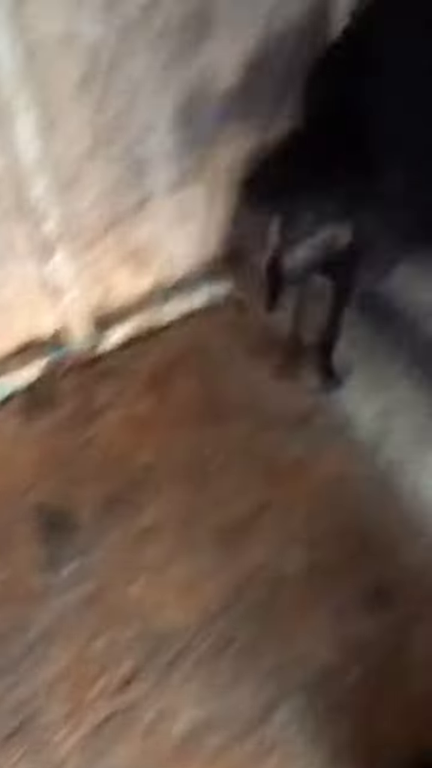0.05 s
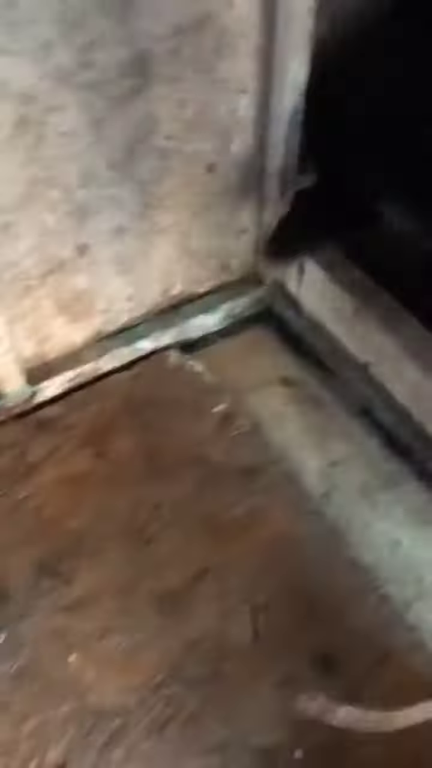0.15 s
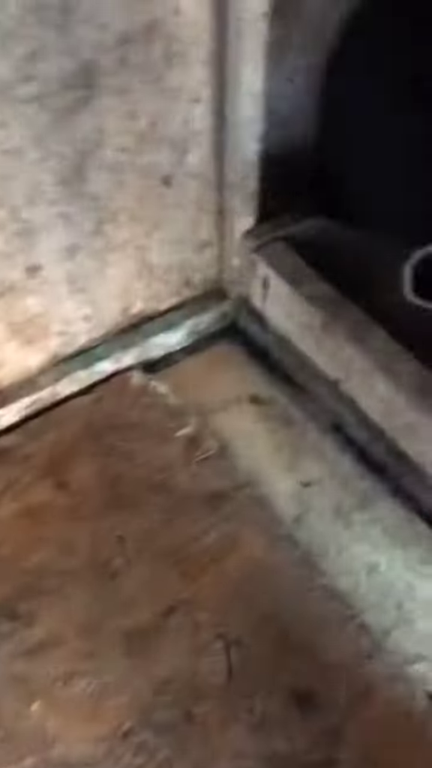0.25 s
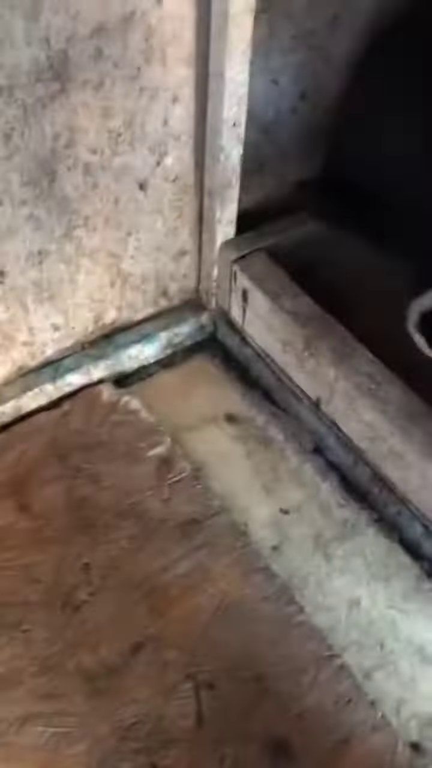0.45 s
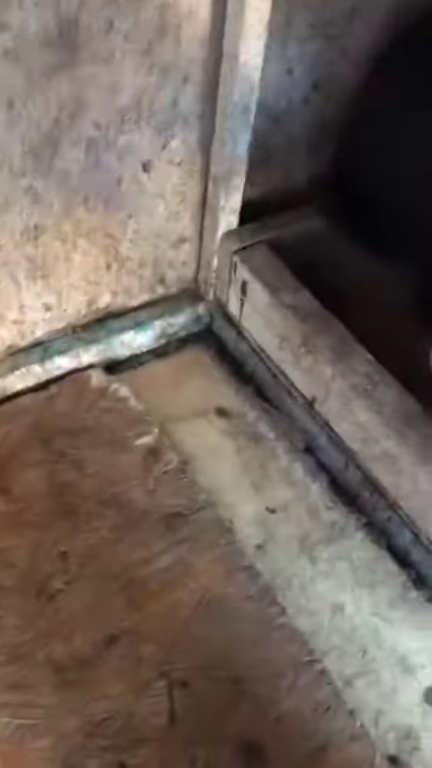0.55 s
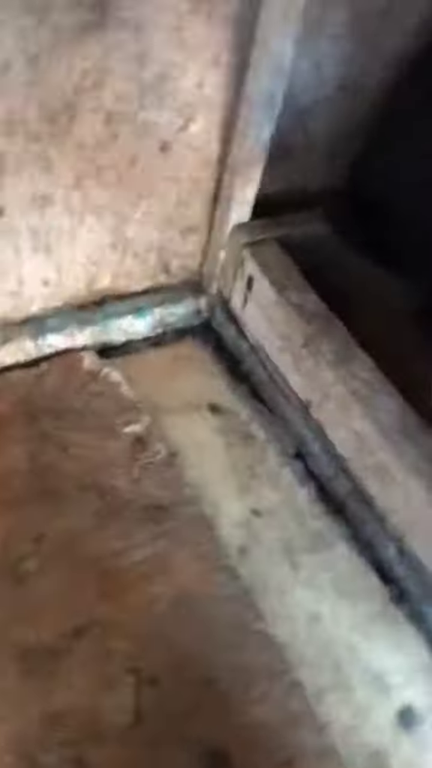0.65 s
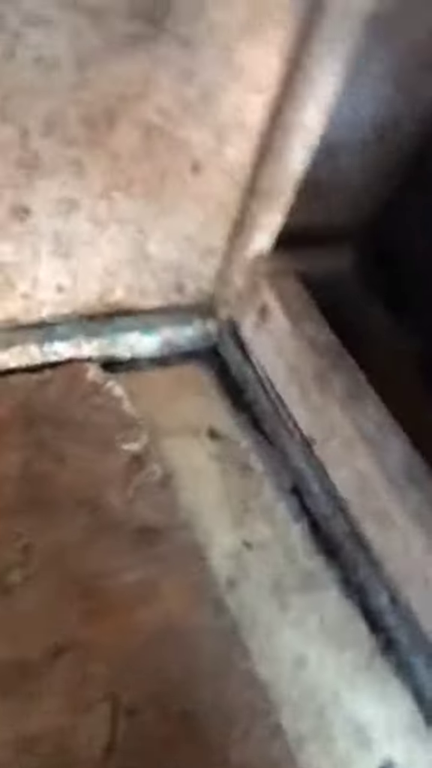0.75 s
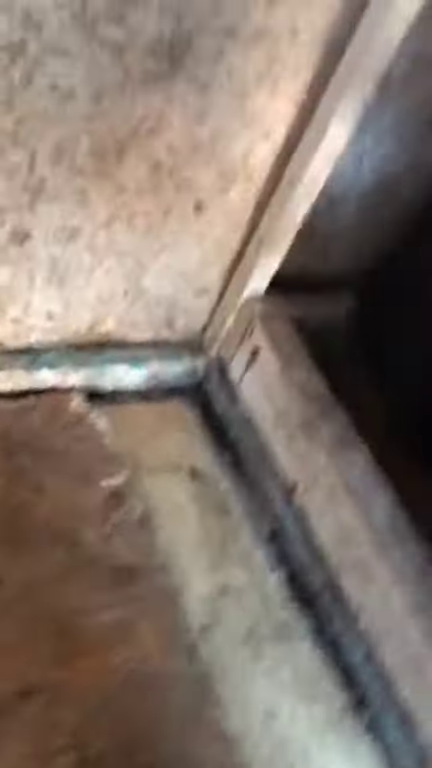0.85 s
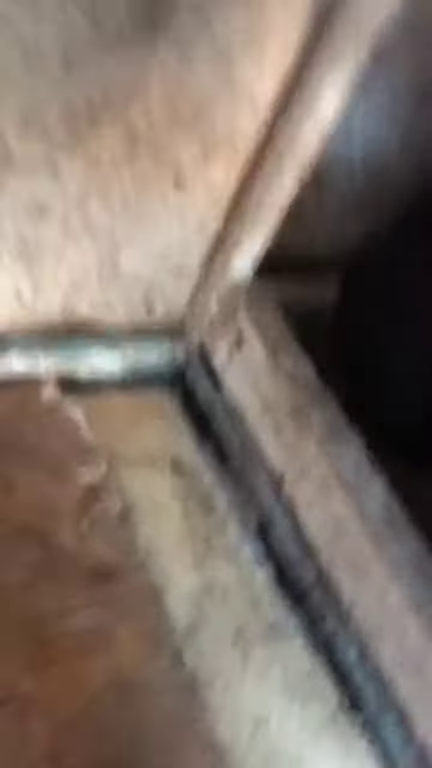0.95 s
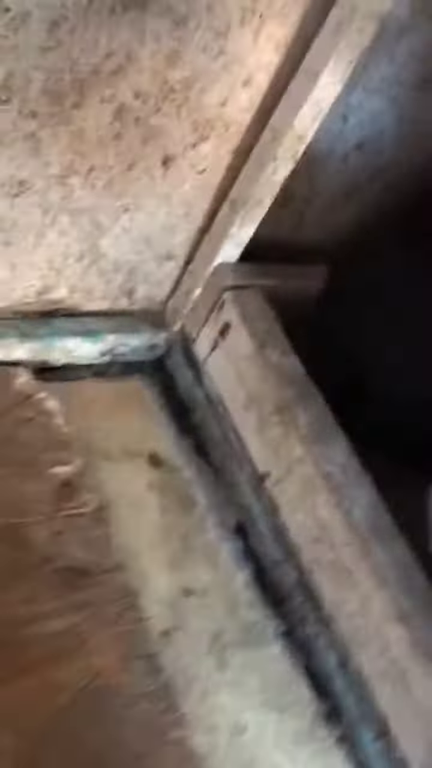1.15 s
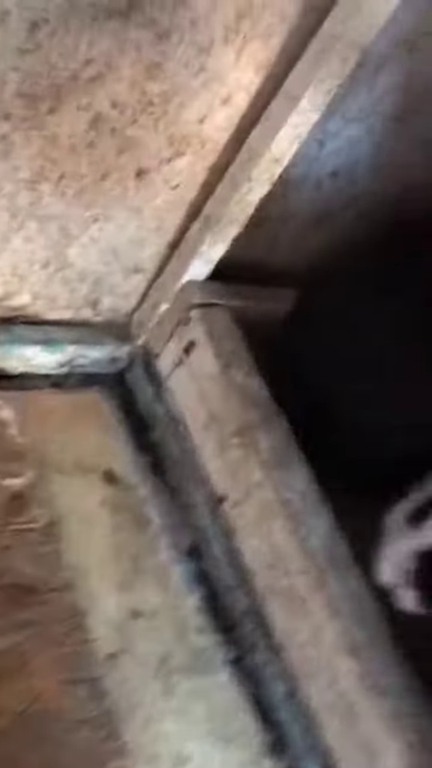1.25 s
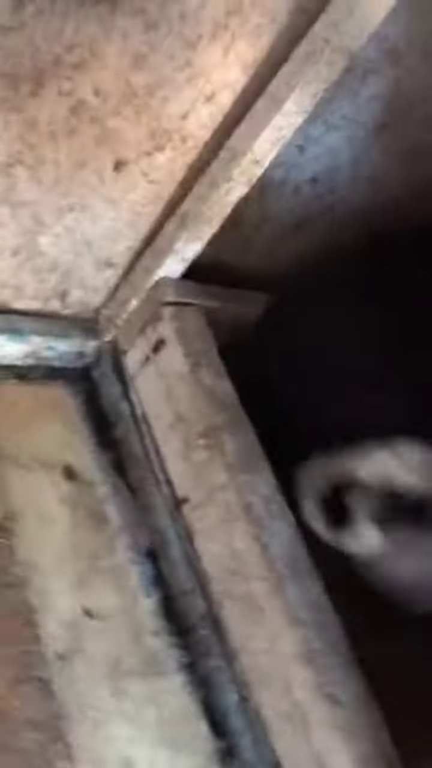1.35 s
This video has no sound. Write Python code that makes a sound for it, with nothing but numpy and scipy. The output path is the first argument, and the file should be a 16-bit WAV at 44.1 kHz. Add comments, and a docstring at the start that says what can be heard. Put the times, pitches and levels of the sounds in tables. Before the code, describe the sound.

In a small shed, something like a foot lands on wooden boards with a single low thud and a short boom. A light tap comes next, while quiet rumble, soft rustling, scuffs and two faint squeaks sit behind.

```python
"""Thump on a wooden animal pen

One dull thump in a small shed, probably a foot: it brushes the boards, lands, then its weight follows.
The boards ring briefly and the shed booms after them. A small sharp tap comes next.
Around it: low rumble, soft rustling with light scuffs and knocks, and two faint squeaks."""
import sys
import numpy as np
from scipy import signal
from scipy.fft import rfft, irfft
from scipy.io import wavfile

SR = 44100
rng = np.random.default_rng(int(sys.argv[2]) if len(sys.argv) > 2 else 0)


def store_wav(level_fs):
    """Save 16-bit WAV to argv[1]."""
    pcm = np.round(np.clip(np.atleast_2d(level_fs), -1, 1) * 32767)
    wavfile.write(sys.argv[1], SR, pcm.T.astype(np.int16))


N = 61739
T = np.arange(N) / SR

# blows on the boards, second is the main one: start_s, force_db, contact_s
FOOT_BLOWS = [(0.2153, -16, .0013), (0.2306, 0, .0013), (0.2396, -4, .0032), (0.2915, -22, .0018)]


def from_db(db):
    """Decibels to gain."""
    return 10 ** (np.asarray(db) / 20)


def unit_rms(x):
    """Scale to unit rms."""
    return x / np.sqrt(np.mean(x ** 2) + 1e-20)


def envelope(points):
    """Gain over time from (time_s, level_db) points."""
    return from_db(np.interp(T, *np.transpose(points)))


def noise(spectrum):
    """Unit-rms noise with the given spectrum, rolling off below its lowest point."""
    hz, db = np.transpose(spectrum)
    bins_hz = np.maximum(np.arange(N + 1) * SR / (2 * N), 1)
    gain = from_db(np.interp(np.log(bins_hz), np.log(hz), db))
    rolloff = np.minimum(bins_hz / hz[0], 1) ** 2
    return unit_rms(irfft(rfft(rng.standard_normal(2 * N)) * gain * rolloff)[:N])


def drift(rate_hz):
    """Smooth random wander, unit rms."""
    lowpass = signal.butter(2, rate_hz, fs=SR, output="sos")
    return unit_rms(signal.sosfilt(lowpass, rng.standard_normal(2 * N))[N:])


def low_cut(x, hz, order):
    """Butterworth high-pass."""
    return signal.sosfilt(signal.butter(order, hz, "high", fs=SR, output="sos"), x)


def swell(peak_s, level_db, rise_s, t60_s):
    """Gaussian rise, exponential decay."""
    rise = np.exp(-(np.minimum(T - peak_s, 0) / rise_s) ** 2)
    return rise * from_db(level_db - 60 * np.maximum(T - peak_s, 0) / t60_s)


def contact(start_s, contact_s):
    """Unit-area force pulse: the longer, the duller."""
    progress = np.clip((T - start_s) / max(contact_s, 3 / SR), 0, 1)
    pulse = np.sin(np.pi * progress) ** 2
    return pulse / (pulse.sum() + 1e-20)


def ring(force, modes):
    """Force-driven damped modes; neighbours swing in opposite directions."""
    motion = np.zeros(N)
    for k, (pitch_hz, gain_db, t60_s) in enumerate(modes):
        radius = from_db(-60 / (t60_s * SR))
        step_rad = 2 * np.pi * pitch_hz / SR
        feedback = [1, -2 * radius * np.cos(step_rad), radius ** 2]
        mode = signal.lfilter([0, np.sin(step_rad)], feedback, force + 1e-18)
        motion -= (-1) ** k * from_db(gain_db) * mode
    return motion


def friction(spectrum, grain_db, grain_hz):
    """Unit-rms noise, made grainy by a fast level flicker."""
    return unit_rms(noise(spectrum) * from_db(grain_db * drift(grain_hz)))


def rubs(bursts, spectrum, grain_db):
    """Short bursts of friction noise."""
    return sum(swell(*burst) for burst in bursts) * friction(spectrum, grain_db, grain_hz=600)


def rumble():
    """Low background noise, slowly varying in level."""
    # rumble contour: time_s, level_db
    levels = [(0, -47.5), (.12, -42), (.35, -51), (.5, -44), (.62, -48.5), (.79, -50), (.88, -46),
              (.96, -47), (1.06, -45), (1.14, -46.5), (1.31, -43), (1.38, -36.5), (1.4, -44)]
    # rumble colour: freq_hz, relative_db
    spectrum = [(25, -22), (45, -6), (68, 2), (100, -8.5), (170, -11), (270, -12), (450, -18.5),
                (750, -22.5), (1400, -26), (3000, -35), (12000, -45.5)]
    return envelope(levels) * noise(spectrum)


def movement():
    """Soft rustling with scuffs, ticks and hollow knocks."""
    # rustle contour: time_s, level_db
    rustle_levels = [(0, -57), (.02, -48), (.08, -58), (.2, -56), (.28, -64), (.335, -68), (.41, -62),
                     (.47, -56.5), (.58, -50), (.86, -49), (.885, -49.5), (.96, -50), (1.02, -45.5),
                     (1.07, -54), (1.22, -56.5), (1.29, -43.5), (1.34, -44), (1.38, -37.5), (1.4, -44)]
    # light scuffs, crisp ticks: peak_s, level_db, rise_s, t60_s
    scuff_bursts = [(0.087, -41, 0.006, 0.039), (0.188, -46, 0.015, 0.16), (0.921, -48.5, 0.021, 0.14),
                    (0.984, -42, 0.0026, 0.064), (1.033, -50, 0.0094, 0.04), (1.361, -42, 0.015, 0.1),
                    (1.387, -43, 0.015, 0.043)]
    tick_bursts = [(0.934, -51, .002, .03), (0.956, -48, .003, .03), (1.024, -46, .005, .04),
                   (1.359, -43, .002, .03), (1.386, -42, .002, .03)]
    # friction colours: freq_hz, relative_db
    rustle_spectrum = [(150, -46), (500, -5.5), (1300, 2), (1800, -1.5), (3500, -1), (6000, -2.5),
                       (9000, -3.5), (12000, -10.5)]
    scuff_spectrum = [(80, -34), (250, -1.5), (600, -2), (900, -11), (1600, -12.5), (3000, -20.5),
                      (12000, -37)]
    tick_spectrum = [(1000, -37), (4000, -24), (8000, 12), (12000, -14)]
    # light knocks: start_s, force_db
    knock_hits = [(0.083, 1), (0.982, 2), (1.031, -2.5)]
    # hollow resonances: pitch_hz, gain_db, t60_s
    knock_modes = [(217, -42, 0.1), (432, -44, 0.1), (577, -41, 0.059)]
    rustle = envelope(rustle_levels) * friction(rustle_spectrum, grain_db=1.5, grain_hz=510)
    scuffs = rubs(scuff_bursts, scuff_spectrum, grain_db=2.2)
    ticks = rubs(tick_bursts, tick_spectrum, grain_db=-4)
    force = sum(from_db(db) * contact(start_s, contact_s=0.0008) for start_s, db in knock_hits)
    return rustle + scuffs + ticks + ring(force, knock_modes)


def squeaks():
    """Two thin, slightly wavering tones."""
    # faint squeaks: peak_s, pitch_hz, level_db, rise_s, t60_s
    tones = [(0.034, 1765, -38.5, 0.019, 0.08), (0.886, 1844, -46, 0.0069, 0.067)]
    sound = np.zeros(N)
    for peak_s, pitch_hz, level_db, rise_s, t60_s in tones:
        wavering_hz = pitch_hz * (1 + 0.0102 * drift(rate_hz=73))
        phase_rad = 2 * np.pi * np.cumsum(wavering_hz) / SR
        sound += swell(peak_s, level_db, rise_s, t60_s) * np.sin(phase_rad)
    return sound


def tap():
    """A small hard tap over a soft low thud."""
    # tap resonances: pitch_hz, gain_db, t60_s
    modes = [(226, -22, 0.025), (560, -24, 0.017), (850, -18, 0.011), (1170, -22.5, .009),
             (1770, -26, 0.014), (2900, -18, 0.0072), (3480, -20, 0.006), (5500, -29.5, 0.0051)]
    start_s, thud_delay_s = 0.5334, 0.003
    thud_hz, thud_gain_db, thud_t60_s = 97, -24, 0.097
    thud_force = contact(start_s + thud_delay_s, contact_s=0.001)
    thud = ring(thud_force, [(thud_hz, thud_gain_db, thud_t60_s)])
    return ring(contact(start_s, contact_s=0.00018), modes) + thud


def shed():
    """The room answers the main blow with standing waves and a dull tail that swells just after."""
    # standing waves: pitch_hz, gain_db, t60_s
    modes = [(55.3, -32, 1.2), (60.8, -32.5, .79), (77, -31, .85), (133.3, -27.5, .68), (169, -27.5, .39),
             (185.3, -38, .75), (249, -33, .55), (283.3, -23.6, .26), (312.7, -31, .37), (372.3, -35, .33)]
    # diffuse tail colour: freq_hz, relative_db
    tail_spectrum = [(100, 1), (200, 8.5), (380, 3), (520, -12), (1000, -16.5), (2000, -30), (6000, -35.5),
                     (12000, -54)]
    room_delay_s, tail_delay_s = 0.0201, 0.054
    start_s = FOOT_BLOWS[1][0] + room_delay_s
    tail = noise(tail_spectrum) * swell(start_s + tail_delay_s, level_db=-34, rise_s=0.073, t60_s=0.28)
    return ring(contact(start_s, contact_s=0.00138), modes) + tail


def thump():
    """The foot strikes the boards, grit rubs under it, and its weight swings the whole panel."""
    # board resonances: pitch_hz, gain_db, t60_s
    board_modes = [(140.4, -19.5, .45), (163, -6.3, .115), (205, -3, .029), (271.2, -2.6, .11),
                   (317, -17, .1), (352, -7.5, .075), (499, -29, .05), (575, -17.5, .05), (668, -20, .1),
                   (712, -22, .09), (830, -25, .1), (985, -21, .07)]
    # sole rubbing, grit crunching: peak_s, level_db, rise_s, t60_s
    sole_bursts = [(0.2165, -37.5, 0.0069, 0.098), (0.2235, -28.5, 0.0038, 0.045),
                   (0.2345, -27, 0.0031, 0.069)]
    crunch_bursts = [(0.2309, -22, 0.00094, 0.016), (0.2915, -43.5, 0.0012, 0.018)]
    # friction colours: freq_hz, relative_db
    sole_spectrum = [(400, 7), (700, 14.5), (1400, 0), (2700, -6), (5500, -8), (8000, -11.5), (12000, -18)]
    crunch_spectrum = [(1500, 3), (3000, -1.5), (4200, -1), (5800, 1.5), (7500, -7.5), (12000, -6.5)]
    panel_hz, panel_gain_db, panel_t60_s = 70.6, -2.8, 0.05
    force = sum(from_db(db) * contact(start_s, contact_s) for start_s, db, contact_s in FOOT_BLOWS)
    boards = low_cut(ring(force, board_modes), hz=105, order=2)
    weight = contact(start_s=0.2461, contact_s=0.0096)
    panel = ring(weight, [(panel_hz, panel_gain_db, panel_t60_s)])
    sole = rubs(sole_bursts, sole_spectrum, grain_db=3.0)
    crunches = rubs(crunch_bursts, crunch_spectrum, grain_db=1.5)
    return boards + panel + sole + crunches


def scene():
    """All sources, mono."""
    return (rumble() + thump() + shed() + tap() + squeaks() + movement())[None]


def record(dry):
    """The microphone loses the deepest bass; the top is cut steeply."""
    cutoff_hz = 12100
    lowpass = signal.ellip(12, 0.1, 80, cutoff_hz, fs=SR, output="sos")
    return signal.sosfilt(lowpass, low_cut(dry, hz=37, order=4))


dry = scene()
out = record(dry)
store_wav(out)
```